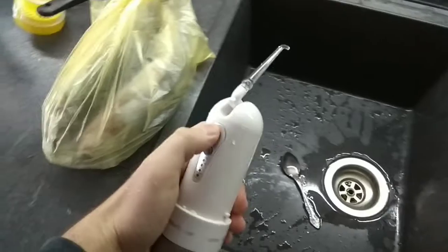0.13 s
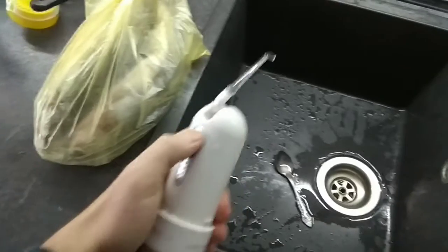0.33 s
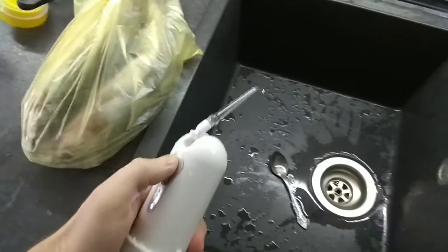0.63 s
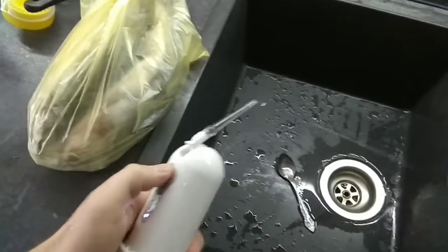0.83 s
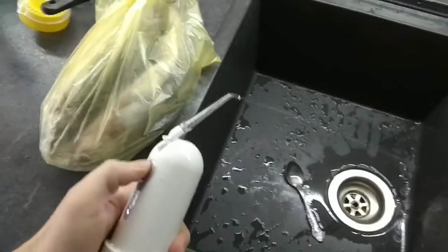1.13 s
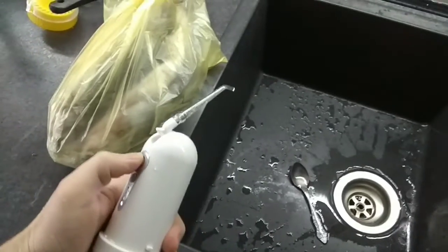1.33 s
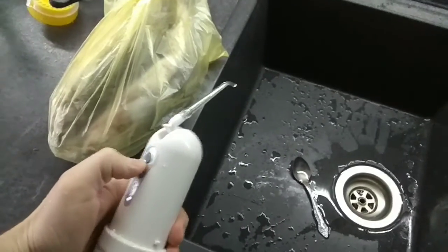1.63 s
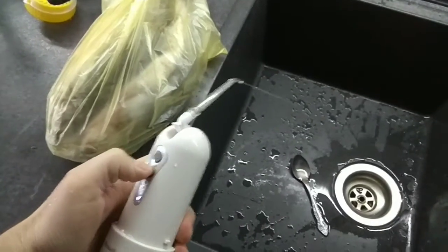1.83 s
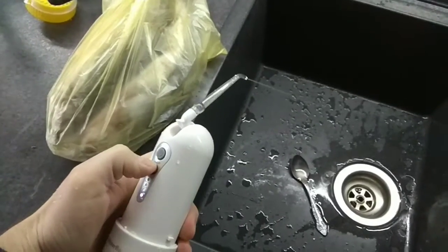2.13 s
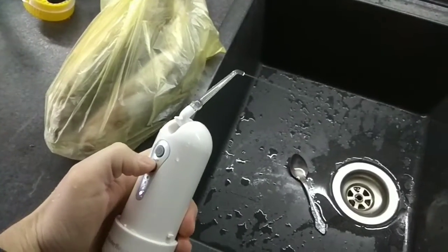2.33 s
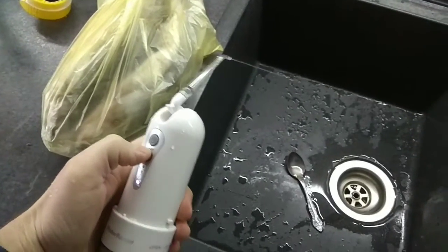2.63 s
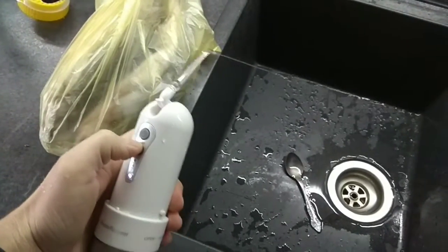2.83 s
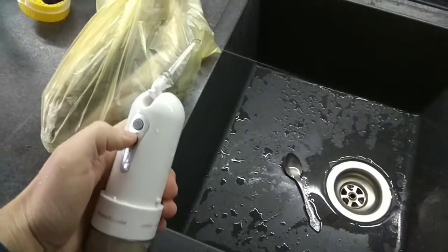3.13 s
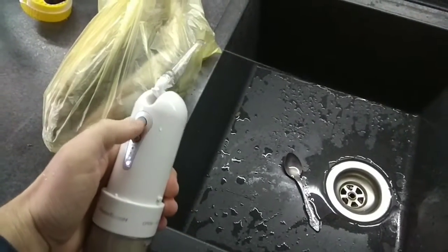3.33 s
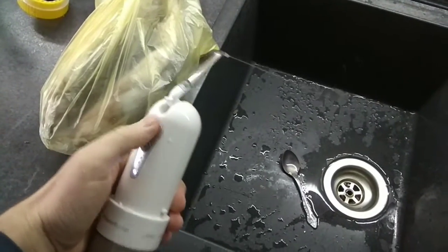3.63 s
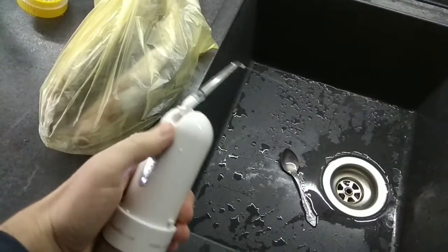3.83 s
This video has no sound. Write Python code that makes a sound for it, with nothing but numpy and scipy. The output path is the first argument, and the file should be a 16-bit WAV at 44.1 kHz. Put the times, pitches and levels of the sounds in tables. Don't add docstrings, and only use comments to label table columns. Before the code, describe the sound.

Water flosser clicks on, its rattling motor buzzing, then sprays rapid pulsing water into a sink

```python
import sys
import numpy as np
from scipy import signal
from scipy.fft import rfft, irfft
from scipy.io import wavfile

SR = 44100
rng = np.random.default_rng(int(sys.argv[2]) if len(sys.argv) > 2 else 0)


def pcm_store(signal):
    levels = np.round(np.clip(np.atleast_2d(signal), -1, 1) * 32767)
    wavfile.write(sys.argv[1], SR, levels.astype(np.int16).T)


def magnitude_from_level(level_db):
    exponent = np.asarray(level_db, float) / 20
    return 10 ** exponent


N = 176400
T = np.arange(N) / SR
HZ = np.maximum(np.arange(N // 2 + 1) * SR / N, 1)
SIDES = np.array([[.5], [-.5]])
GATE_OPENS_S = .333
BIGGEST_DROP = 3


def curve(points):
    hz, db = np.array(points).T
    return magnitude_from_level(np.interp(np.log(HZ), np.log(hz), db))


def bell(center_hz, width_hz):
    return 1 / (1 + ((HZ / center_hz - center_hz / HZ) * center_hz / width_hz) ** 2)


def filtered(x, gain):
    return irfft(rfft(x) * gain, N)


def shape(x, gain):
    y = filtered(x, gain)
    return y / np.sqrt(np.mean(y ** 2))


def noise():
    return rng.standard_normal(N)


def walk(rate):
    return shape(noise(), 1 / (1 + (HZ / rate) ** 2))


def flicker(rate):
    return shape(noise(), HZ / rate / (1 + (HZ / rate) ** 3))


def pair(make, alike):
    left, other = make(), make()
    return np.array([left, alike * left + np.sqrt(1 - alike ** 2) * other])


def ports(x, pan):
    lag_s = -.00007
    split = curve(pan) ** SIDES * np.exp(-2j * np.pi * HZ * lag_s * SIDES)
    return (T > GATE_OPENS_S) * filtered(x, split)


def bursts(events, attack_s, t60_s):
    env = np.zeros(N)
    tau = T[:SR // 2]
    lead_s = .001
    for start_s, level_db, *rise in events:
        k = int((start_s - lead_s) * SR)
        stretch = np.clip(rise[0] if rise else 1, .3, 8)
        tail = (1 - np.exp(-tau / (attack_s * stretch))) * magnitude_from_level(-60 * tau / t60_s)
        env[k:k + len(tau)] += magnitude_from_level(level_db) * tail[:N - k] / tail.max()
    return env


# time_s, speed_strokes_per_s, rattle_db, load (0-1), mesh_tone_db
PUMP_COURSE = [(.45, 20.8, -38, .1, 0), (.6, 24.6, -33.5, 0.02, 0), (.9, 25.3, -34, 0, 1),
               (1.2, 26.3, -34, 0, 1), (1.4, 27.6, -33.5, .04, 3), (1.55, 27.3, -33, .2, 4),
               (1.65, 24.4, -33, .3, 6), (1.85, 23.7, -32.5, .3, 6), (2.0, 23.5, -32.5, .45, 6),
               (2.1, 21.8, -32.5, .7, 2), (2.25, 20.9, -32, .92, 0), (3.1, 20.8, -32.5, 1, 0),
               (4, 20.8, -33, 1, -2)]
PRIMED_S, LOADED_HZ = 2.28, 20.8
STROKE_S = 3.1105
PUSH_PLACE, RETURN_PLACE, PUSH_WIDTH = .17, .62, .115
CROWN_TEETH, PINION_TEETH = 93, 17


def pump_course(column):
    p = np.array(PUMP_COURSE).T
    return np.interp(T, p[0], p[column])


def pump_cycle():
    strokes_per_s = np.where(T > PRIMED_S, LOADED_HZ, pump_course(1))
    stroke = np.cumsum(strokes_per_s) / SR
    stroke -= stroke[int(STROKE_S * SR)]
    load = np.clip(pump_course(3), 0, 1.5)
    from_push = (stroke - PUSH_PLACE + .5) % 1 - .5
    push = np.exp(-.5 * (from_push / PUSH_WIDTH) ** 2) - .5
    return stroke, load, push


def gear_mesh(stroke, load):
    sag = .006 * load * np.sin(2 * np.pi * stroke) / (2 * np.pi)
    jitter = .07 * np.clip(1.2 - load, 0, 1) * flicker(40)
    return CROWN_TEETH * (stroke + sag) + .1 * walk(12) + jitter


# center_hz, width_hz, level_db
SHELL_RINGS = [(948, 180, -12), (1156, 18, -13.5), (1970, 245, -2.5), (2215, 33, -9), (2340, 143, -5.5),
               (2583, 21, -7), (3180, 325, -2.5), (3480, 860, -8), (4230, 50, -9), (4850, 69, -8.5),
               (5900, 580, -3.5), (10450, 250, -10.5), (11800, 300, -14)]
# center_hz, width_hz, level_db
SHELL_DIPS = [(2757, 115, -7), (4310, 235, -5.5), (7250, 260, 0), (9900, 160, -4), (11200, 280, -14),
              (13600, 560, -16), (15000, 1700, -13)]


def shell_response():
    ring_db = 12
    power = sum(magnitude_from_level(2 * (ring_db + db)) * bell(hz, width) for hz, width, db in SHELL_RINGS)
    dip_db = sum(db * bell(hz, width) for hz, width, db in SHELL_DIPS)
    return np.sqrt(1 + power) * magnitude_from_level(dip_db)


def mesh_tone(stroke, load, push, mesh, rings):
    second_teeth, return_teeth = 146.7, 125.8
    wobble = magnitude_from_level(-3) * np.sin(2 * np.pi * mesh * (1 + 1 / PINION_TEETH))
    second = magnitude_from_level(-9) * load * np.sin(2 * np.pi * mesh * second_teeth / CROWN_TEETH)
    push_db, load_db, rough_db, mesh_db = 25, -3, .8, -44
    level_db = (push_db * push + load_db) * load + rough_db * flicker(44) + mesh_db + pump_course(4)
    tone = (np.sin(2 * np.pi * mesh) + wobble + second) * magnitude_from_level(level_db)
    back = np.exp(-.5 * ((stroke % 1 - RETURN_PLACE) / PUSH_WIDTH) ** 2) * load
    tone = tone + magnitude_from_level(-43) * back * np.sin(2 * np.pi * mesh * return_teeth / CROWN_TEETH)
    return filtered(tone, (np.abs(rings) / 3) ** .21)


def slap():
    return noise() * magnitude_from_level(2.0 * np.minimum(rng.exponential(size=N), BIGGEST_DROP))


def grip(x):
    edges = 3800 * 1.1 ** np.arange(16.)
    band, spectrum = np.searchsorted(edges, HZ), rfft(x)
    out = 0
    for k in range(len(edges)):
        swell_db = 3 * (k > 0) * walk(9)
        out = out + irfft(spectrum * (band == k), N) * magnitude_from_level(swell_db)
    return out


# freq_hz, level_db (per Hz)
SHELL_BASE_COLOUR = [(40, -48), (250, -34.5), (700, -22), (1000, -9.5), (1600, -14), (2500, -10),
                     (4400, -13.5), (16000, -25.5)]
SHELL_ALIKE = .22


def tooth_rattle(load, push, mesh, rings):
    tooth = np.floor(mesh).astype(int)
    tooth -= tooth.min()
    crown_wear = .5 * rng.standard_normal(CROWN_TEETH)[tooth % CROWN_TEETH]
    pinion_wear = .25 * rng.standard_normal(PINION_TEETH)[tooth % PINION_TEETH]
    struck = np.diff(tooth, prepend=0) > 0
    knocks = struck * (crown_wear + pinion_wear + pair(slap, SHELL_ALIKE))
    knocks = knocks + .25 * pair(noise, SHELL_ALIKE)
    push_db, wet_db, wet_dip_db = 3, -4, -8
    rattle = shape(knocks, curve(SHELL_BASE_COLOUR) * rings) * magnitude_from_level(push_db * load * push)
    upper = filtered(rattle, 1 / (1 + (2660 / HZ) ** 8))
    rattle = rattle + upper * (magnitude_from_level(wet_db * load) - 1)
    damped_mode = filtered(rattle, bell(3640, 330))
    rattle = rattle + damped_mode * (magnitude_from_level(wet_dip_db * load) - 1)
    return grip(rattle)


# pitch_hz, level_db, left_over_right_db
DRIVE_WHINE = [(981.8, -49.5, -3), (1963.6, -58, -4), (1142, -60.5, 0), (769, -69, 0), (1286, -66, 0),
               (1496, -66, 0)]


def drive_whine(load):
    whine = 0
    for hz, db, pan in DRIVE_WHINE:
        level_db = db + pan * SIDES + 3.5 * load + 2 * walk(50)
        whine = whine + magnitude_from_level(level_db) * np.sqrt(2) * np.sin(2 * np.pi * hz * T + .24 * walk(12))
    return whine


def slosh(load):
    center_hz = 476
    colour = HZ / center_hz / (1 + (HZ / center_hz) ** 4)
    return shape(pair(noise, .95), colour) * magnitude_from_level(-66 + 7.5 * load + 2.0 * walk(4.3))


def whirr(load):
    level_db = -50 - 6 * load + 10.6 * SIDES
    return shape(pair(slap, SHELL_ALIKE), bell(8350, 900)) * magnitude_from_level(level_db)


# freq_hz, left_over_right_db
RATTLE_PAN = [(300, -4), (1000, 0), (2300, 6.5), (3200, -1.5), (4400, -0.5), (8000, 5.5), (15000, 20.5)]


def motor():
    stroke, load, push = pump_cycle()
    mesh = gear_mesh(stroke, load)
    rings = shell_response()
    effort = magnitude_from_level(pump_course(2))
    rattle = ports(tooth_rattle(load, push, mesh, rings) * effort, RATTLE_PAN)
    tone = mesh_tone(stroke, load, push, mesh, rings)
    tone = tone * effort / np.median(effort) * magnitude_from_level(15 * SIDES)
    on_s, spin_up_s = .4515, .003
    on = np.clip((T - on_s) / spin_up_s, 0, 1)
    return on * (rattle + tone + drive_whine(load) + slosh(load) + whirr(load))


def drops():
    drops_per_s, spread_db, patchy_db, patches_per_s = 9000, 2, 2.3, 64
    hit = rng.random(N) < drops_per_s / SR
    strength = magnitude_from_level(spread_db * np.minimum(rng.exponential(size=N), BIGGEST_DROP))
    spectrum = rfft(hit * noise() * strength)
    edges = SR / 2 * 1.25 ** -np.arange(9., -1, -1)
    band = np.searchsorted(edges, HZ)
    out = 0
    for k in range(len(edges)):
        out = out + irfft(spectrum * (band == k), N) * magnitude_from_level(patchy_db * flicker(patches_per_s))
    return out


# start_s, peak_db, rise (times the usual attack, if given)
AIRY_SPUTTER = [(0.5198, -15, .5), (0.5685, -17, .5), (0.585, -25), (0.63, -32), (1.3, -25.5),
                (1.2007, -18.5), (1.2726, -31), (1.3524, -27), (1.4227, -24.5), (1.5997, -24),
                (1.6796, -27), (1.7197, -23.5), (1.759, -22.5), (1.8338, -23.5), (1.885, -19.5),
                (1.9176, -21), (1.9675, -18), (2.001, -16.5), (2.044, -22), (2.114, -27), (2.154, -20),
                (2, -29), (2.2496, -14)]
# start_s, peak_db, rise (times the usual attack)
LOADED_SPURTS = [(2.294, -22.5, 2), (2.3414, -19, 0.86), (2.389, -17, 1), (2.439, -18, 2), (2.4866, -21, 2),
                 (2.534, -26, 3), (2.5816, -19.5, 2.4), (2.6335, -23.5, 3.3), (2.678, -23.5, 4.4),
                 (2.726, -19, 2), (2.7756, -15.5, 1.7), (2.823, -20.5, 3), (2.87, -18, 1), (2.9183, -21, 3),
                 (2.9658, -16, 1.6), (3.014, -16.5, 2), (3.0615, -15, 2.8),
                 (3.1116, -14, 1.6), (3.1562, -10, 3), (3.207, -13.5, 1.4), (3.2547, -10.5, 1.3),
                 (3.3037, -13.5, 1.5), (3.3515, -14.5, 1.4), (3.3993, -11.5, 1.1), (3.4462, -14, 2),
                 (3.495, -15.5, 2.3), (3.543, -15.5, 1.8), (3.5914, -17.5, 2), (3.6401, -16, 3.1),
                 (3.689, -17, 3), (3.7366, -19, 3), (3.785, -16, 1), (3.8343, -19, 2), (3.882, -18.5, 1.6),
                 (3.9293, -20.5, 2), (3.977, -21, 2)]
# time_s, level_db
FINE_MIST = [(0.47, -75), (0.52, -40), (0.66, -62), (1.15, -64), (1.62, -52), (1.84, -51), (2.12, -29.5),
             (2.47, -45.5), (2.89, -45), (3.17, -52), (3.32, -48.5), (3.7, -56), (4.0, -44)]
# freq_hz, level_db (per Hz)
SPRAY_COLOUR = [(180, -54), (300, -22), (701, 1), (994, 1), (1580, 0.5), (1970, 1), (4830, -10), (13100, 2),
                (16000, -4)]
# freq_hz, level_db
SPRAY_TILT = [(300, -10.5), (3500, -1.5), (6000, 2), (16000, 4)]
# freq_hz, left_over_right_db
SPRAY_PAN = [(2000, 2), (6000, 4), (9000, 10), (14000, 13.5)]
# start_s, level_db
HAND_BUMPS = [(.56, -62), (1.17, -62), (1.84, -68), (2.24, -62), (2.71, -70), (2.85, -66), (3.15, -62),
              (3.255, -64), (3.73, -64), (3.85, -63)]


def jet():
    events = AIRY_SPUTTER + LOADED_SPURTS
    spurt = bursts(events, .001, .07)
    splash = magnitude_from_level(-17) * bursts(events, .004, .087)
    crack = magnitude_from_level(-4) * bursts(events, .00068, .015)
    time_s, mist_db = np.array(FINE_MIST).T
    mist = magnitude_from_level(np.interp(T, time_s, mist_db) + .89 * walk(15)) * (T > time_s[0])
    level = (spurt + splash + crack) * magnitude_from_level(-11) + mist
    spray = shape(pair(drops, .1), curve(SPRAY_COLOUR) * curve(SPRAY_TILT)) * level
    shake = shape(pair(noise, .47), 1 / (1 + (HZ / 122) ** 2))
    kick = shake * magnitude_from_level(-57 + 2.7 * walk(5.5)) * bursts(events, .0062, .026)
    bump = shake * magnitude_from_level(-2.5) * bursts(HAND_BUMPS, .008, .09)
    return ports(spray, SPRAY_PAN) + kick + bump


# start_s, level_db
SWITCH = [
    (.3365, -44),
    (.3405, -28.5),
]
# freq_hz, level_db (per Hz)
CLICK_COLOUR = [(120, -41), (200, -36), (491, -37.5), (2000, -15), (4200, -8), (6500, 2), (12400, -9),
                (16000, -8)]


def button():
    click = bursts(SWITCH, .0008, .0089)
    ring = magnitude_from_level(-13.5) * bursts(SWITCH, .0025, .28)
    return ports(shape(noise(), curve(CLICK_COLOUR)) * (click + ring), SPRAY_PAN)


def kitchen(x):
    t60_s, dull_hz, level_db = .3, 9800, -8
    tail = rng.standard_normal((2, N)) * magnitude_from_level(-60 * T / t60_s) * (T > .002)
    tail /= np.sqrt(np.sum(tail ** 2, axis=1, keepdims=True))
    hz = np.arange(N + 1) * SR / (2 * N)
    wet = rfft(x, 2 * N) * rfft(tail, 2 * N) / (1 + 1j * hz / dull_hz)
    return magnitude_from_level(level_db) * irfft(wet)[:, :N]


# pitch_hz, level_db (rms)
APPLIANCE_HUM = [(296, -90), (538, -97), (587, -85), (635, -96)]
# freq_hz, level_db (per Hz)
AIR_COLOUR = [(40, -30), (180, -20), (290, 0), (430, -18), (590, -9), (720, -22), (1500, -28), (2000, -45)]


def quiet():
    air = shape(noise() + 1.27 * rng.standard_normal((2, N)), curve(AIR_COLOUR) * (HZ < 2000))
    hum = sum(magnitude_from_level(db) * np.sqrt(2) * np.sin(2 * np.pi * hz * T) for hz, db in APPLIANCE_HUM)
    return magnitude_from_level(-86 + 21 * (T > GATE_OPENS_S)) * air + hum


def scene():
    near = motor() + jet() + button()
    return near + kitchen(near) + quiet()


def roll_off(x):
    return signal.sosfilt(signal.butter(12, 16990, fs=SR, output="sos"), x)


def record(dry):
    top_hz = 15750
    low_pass = signal.ellip(14, .3, 80, top_hz, fs=SR, output="sos")
    mix = signal.sosfilt(low_pass, dry)
    return roll_off(mix)


dry = scene()
out = record(dry)
pcm_store(out)
```